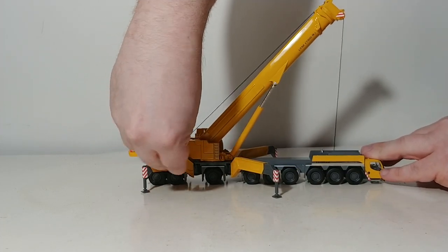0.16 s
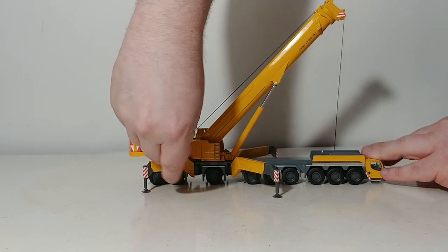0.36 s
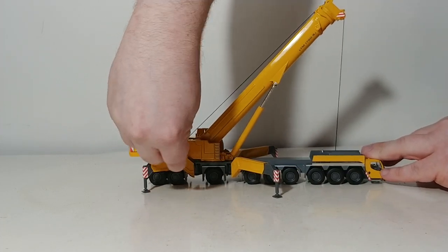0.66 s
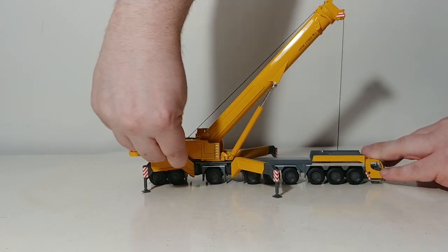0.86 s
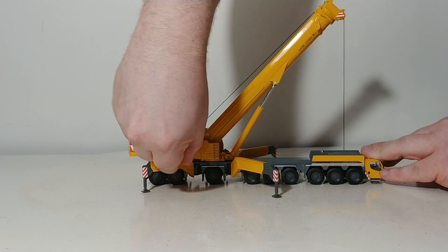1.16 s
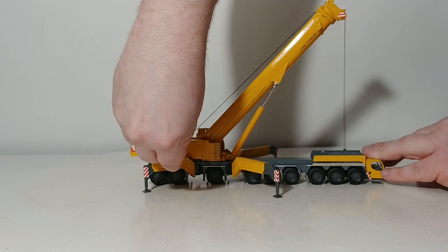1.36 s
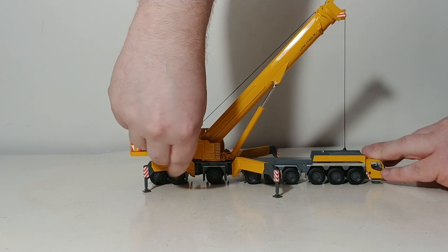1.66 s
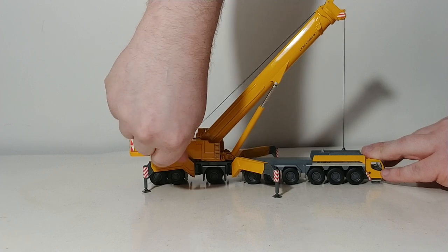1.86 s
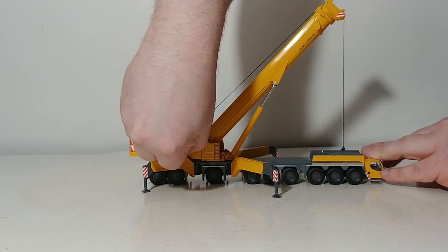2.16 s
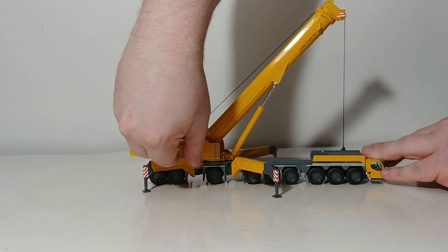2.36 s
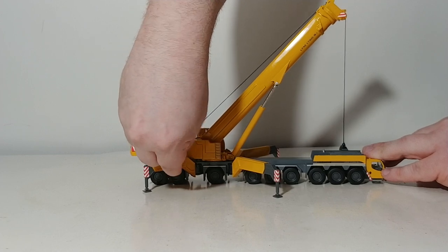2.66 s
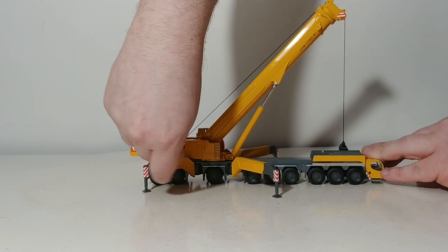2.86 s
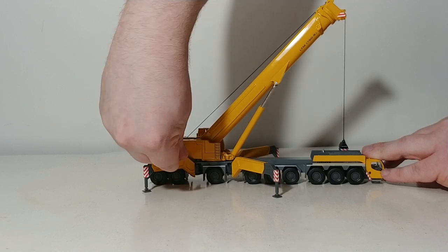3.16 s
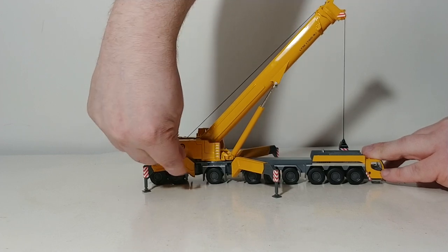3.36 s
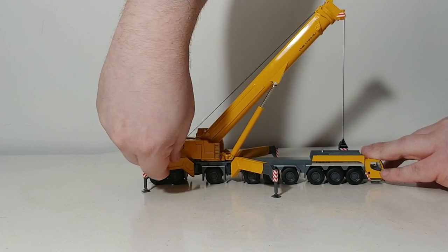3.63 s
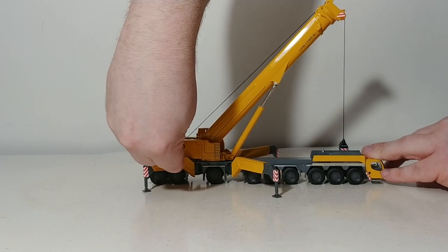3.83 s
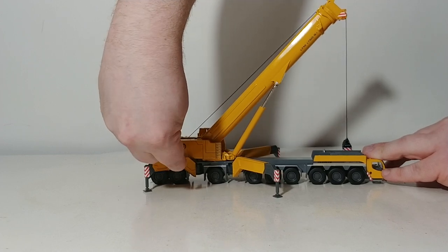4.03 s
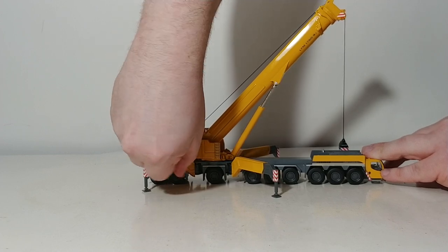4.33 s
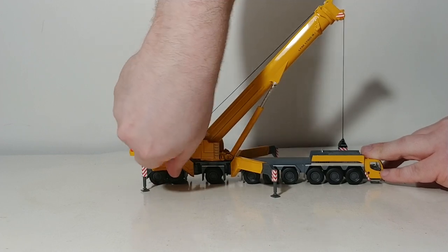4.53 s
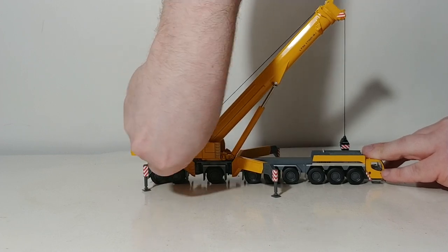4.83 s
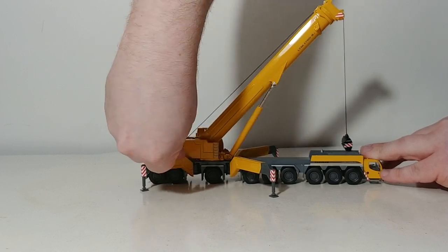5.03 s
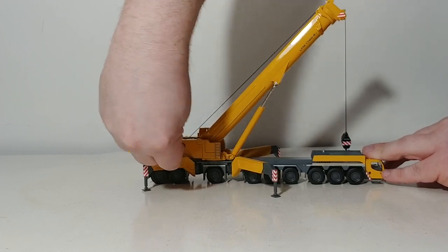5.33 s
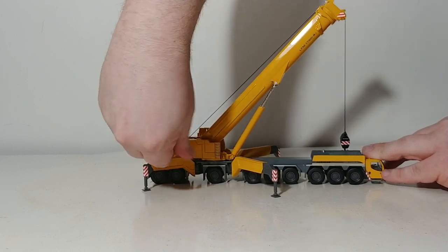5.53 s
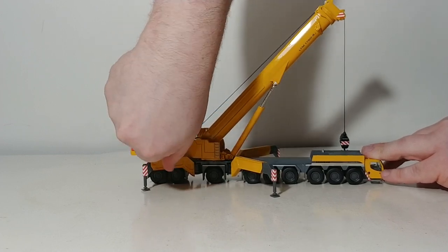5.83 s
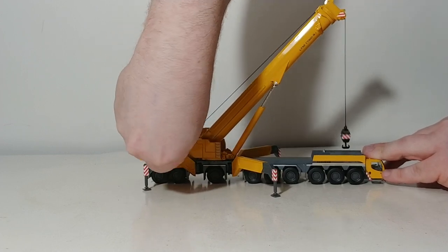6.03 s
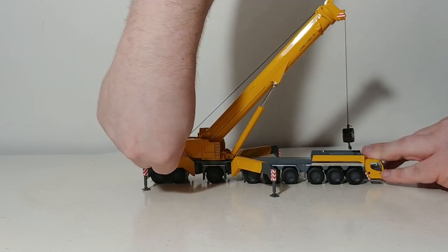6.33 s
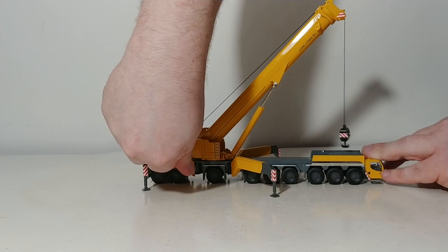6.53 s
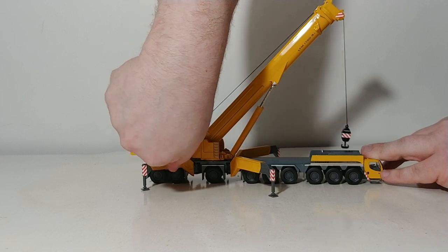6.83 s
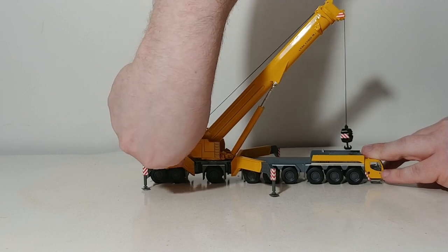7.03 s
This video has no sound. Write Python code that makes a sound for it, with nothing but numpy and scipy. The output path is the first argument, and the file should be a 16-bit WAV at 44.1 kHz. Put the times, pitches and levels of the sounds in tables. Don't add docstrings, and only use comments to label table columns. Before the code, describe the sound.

A small metal model crane's ratchet winch is wound by hand, giving uneven bursts of tiny clicks and soft table knocks in a quiet room.

```python
import sys
import numpy as np
from scipy import signal
from scipy.fft import rfft, irfft, next_fast_len
from scipy.io import wavfile
from scipy.ndimage import uniform_filter1d

SR = 44100
rng = np.random.default_rng(int(sys.argv[2]) if len(sys.argv) > 2 else 0)


def voltage_ratio(decibels):
    exponent = np.asarray(decibels, float) / 20
    return 10 ** exponent


def int16_out(signal):
    q = np.round(np.clip(np.atleast_2d(signal).T, -1, 1) * 32767)
    wavfile.write(sys.argv[1], SR, q.astype(np.int16))


N = 316811
SIZE = next_fast_len(N + SR // 2, True)
FREQ = np.arange(SIZE // 2 + 1) * SR / SIZE

# pitch_hz, density_db (per Hz)
HUM_SPECTRUM = [(20, -15), (50, -1.5), (85, 2.5), (125, 0.5), (200, -9), (400, -18), (630, -24.5),
                (1000, -27.5), (2500, -30), (5400, -38.5), (6300, -59), (7400, -45), (11500, -49.5),
                (12600, -60)]
# pitch_hz, likeness (0-1)
HUM_LIKENESS = [(60, 0.6), (130, 0.83), (270, 0.78), (580, 0.1), (1230, -0.1), (2620, 0), (5570, 0.01),
                (11800, 0.1)]
# pitch_hz, balance_db
HUM_BALANCE = [(60, -5), (110, -0.5), (190, 4), (350, -1.5), (630, 5), (1130, 2), (2030, 0.5), (3660, -0.5),
               (6580, 6.5), (11800, -3)]
# pitch_hz, balance_db
PORT_BALANCE = [(30, -5), (80, .5), (170, 1), (350, 1), (700, -2.5), (1400, 0), (2800, 2), (5000, 9),
                (9500, 3), (12000, -2)]
# pitch_hz, lead_rad
PORT_PHASE = [(0, 1), (780, -2), (1030, 2), (1460, 0.4), (2240, 0.96), (3450, 1.58), (3880, 1.8),
              (4390, -5), (5940, -11), (7580, -3.5), (8700, -13), (9730, -14.5), (10800, -22), (12000, -21)]

# pitch_hz, level_db, t60_s
BODY_MODES = [(1355, -10, 0.047), (1494, -9.5, 0.058), (1666, -15.5, 0.08), (2060, -9.5, 0.07),
              (2300, -4, 0.059), (2450, -8, 0.055), (2670, -9.5, 0.028), (2972, -3, 0.06),
              (3160, -8, 0.053), (3538, -6.5, 0.069), (3643, -7, 0.09), (3814, -5.5, 0.082),
              (4030, -11, 0.057), (4360, -6.5, 0.046), (4545, -13, 0.085), (4800, -15, 0.061),
              (5150, -14, 0.069), (5520, -12, 0.032)]
# pitch_hz, level_db, t60_s
CHASSIS_MODES = [(259.8, -5.5, 0.2), (343.5, -0.5, 0.21), (437, 3, 0.092), (519.5, 2.5, 0.094),
                 (666, 1, 0.09), (762.3, 2, 0.1), (855, -12, 0.051), (1049, -7, 0.05)]
# pitch_hz, level_db, t60_s
TABLE_MODES = [(44.7, -18.5, .15), (81.3, 1.5, 0.22), (118.2, 3.5, 0.14), (179.1, -0.5, 0.16),
               (252.7, -3, 0.13), (329.7, -2, 0.18), (416.3, -9, 0.17)]
# pitch_hz, width_hz, level_db
PAWL_BANDS = [(7450, 1800, -3.5), (8400, 1300, 2), (9330, 770, -8), (10900, 1000, -4)]
# pitch_hz, density_db (per Hz)
CRACK_SPECTRUM = [(290, -17), (500, -23), (951, 0), (2240, 4), (3180, 1), (3730, -14), (4900, 7.5),
                  (6730, -12), (8680, -56), (11600, -30), (12300, -55), (16000, -69), (22000, -120)]

# time_s, level_db
HAND_RUMBLE = [(0.0, -61), (0.92, -59), (1.08, -58.5), (2.28, -57), (2.36, -58.5), (2.96, -63), (3.88, -62),
               (4.08, -52), (4.62, -59), (4.8, -51), (4.98, -45), (5.4, -62), (5.7, -69), (6.0, -56),
               (6.2, -42.5), (6.52, -62), (6.7, -61), (7.18, -54)]
# start_s, length_s, level_db, low_mid_db (relative)
GEAR_RATTLES = [(0, 0.014, -57.5, 7.5), (0.326, 0.1, -71, 11), (0.741, 0.22, -68, 8),
                (0.986, 0.099, -76, 0), (1.261, 0.096, -51.5, 0), (1.334, 0.19, -72, 11.5),
                (1.436, 0.01, -52, -9), (1.624, 0.053, -62, -12), (1.669, 0.14, -68, -14),
                (2.027, 0.23, -70, 7.5), (2.164, 0.27, -73.5, 14), (2.575, .12, -62.5, 8),
                (3.875, 0.13, -67, 9), (3.994, 0.16, -56, 8.5), (4.142, 0.29, -72, 1), (4.035, .04, -56, 0),
                (4.353, 0.05, -68, 16), (4.775, 0.098, -59.5, 3.5), (4.893, 0.04, -46, -4),
                (4.945, 0.05, -45.5, -13), (4.99, .055, -49, -14), (5.055, 0.08, -54, -9),
                (5.245, 0.036, -64.5, 8), (5.996, .05, -60, 10), (6.04, .085, -52.5, 7), (6.15, .2, -59, 6),
                (6.352, 0.15, -68, 5.5), (6.892, 0.2, -73, 10)]
# start_s, peak_db, pitch_hz
SHOVES = [(.004, -42, 112), (.171, -62, 67.3), (.75, -45.5, 83.4), (1.3, -31, 96.9), (1.399, -39, 53.8),
          (1.489, -36, 122.5), (1.678, -54, 80.7), (2.058, -44, 79.6), (2.179, -38.5, 68.6),
          (2.594, -35, 131), (2.629, -34.5, 56.5), (4.043, -30.5, 103), (4.083, -36.5, 85),
          (4.355, -39, 320), (4.784, -36, 103.5), (4.887, -30.5, 351), (4.938, -24, 306),
          (5.011, -36.5, 348), (5.268, -44.5, 170), (6.039, -31.5, 100), (6.084, -34, 80.7),
          (6.479, -41.5, 122)]
# start_s, peak_db, pitch_hz
JOLTS = [(.34, -40.5, 107), (.384, -42.5, 139), (.468, -41.5, 155), (.798, -42.5, 110), (.842, -44, 265),
         (.888, -42.5, 108), (1.274, -32.5, 99.6), (1.866, -34, 169.3), (2.31, -37.5, 159),
         (2.359, -44.5, 99.6), (3.298, -51.5, 362), (3.959, -40.5, 108), (3.999, -38, 320),
         (4.169, -46.5, 176), (4.249, -51.5, 329), (4.988, -31, 261.2), (5.057, -37, 290),
         (5.084, -41, 267), (6.005, -31, 175.6), (6.164, -34.5, 106), (6.216, -37.5, 323),
         (6.268, -38, 87.5), (6.314, -41.5, 320), (6.373, -41.5, 91.5), (6.414, -49, 79.4),
         (6.949, -49, 100)]

# start_s, peak_db, knock_db
BOOM_SLIPS = [(0.3488, -50, 2), (.383, -41, -7.5), (0.4659, -56, 0), (.7312, -56.5, -6), (.84, -37.5, -5),
              (0.9304, -49.5, -2.5), (1.764, -49, -11), (2.1487, -50.5, 3), (2.1763, -34, -2.5),
              (2.255, -47, -15), (2.358, -45, -2), (2.654, -47, -3), (3.4678, -57.5, 2), (3.9663, -53, 10),
              (4, -33.5, -5.5), (4.0827, -36, 1.5), (4.138, -48, -2), (4.1664, -41.5, -5), (4.245, -48, -4),
              (4.349, -46, 6), (4.6325, -51.5, -4), (6.0881, -36.5, -2), (6.2163, -34, 0),
              (6.2692, -53, -6), (6.3148, -36, -1), (6.3624, -48.5, 2), (6.4911, -52, 3)]
# start_s, peak_db, pitch_hz, treble_db
PAWL_SNAPS = [(0.275, -52.5, 2150, -14.5), (1.2513, -60, 2900, -21), (1.493, -31, 4030, -13),
              (1.6397, -48, 3600, -25), (1.6787, -41, 3720, -15.5), (1.711, -46, 1950, -16),
              (1.863, -46, 2440, -16.5), (2.965, -57.5, 2530, -13), (4.2308, -58, 2300, -25),
              (4.4466, -46, 2750, -16.5), (4.5306, -48, 2300, -17), (4.8849, -24, 2450, -15),
              (4.9376, -24, 4360, -21.5)]
# start_s, peak_db, pitch_hz
PINGS = [
    (1.1144, -45.5, 2330),
    (4.3018, -49.5, 2086),
    (4.5131, -64, 2070),
    (5.683, -49, 2374),
    (6.4655, -48.5, 1400),
]
# start_s, peak_db, pitch_hz
DRUM_CLACKS = [
    (0.1573, -60.5, 1940),
    (1.3013, -40.5, 2385),
    (1.9698, -59, 2180),
    (2.017, -60, 2360),
    (2.2313, -57, 2320),
    (2.3288, -55, 2230),
    (2.5918, -52, 2330),
    (6.0351, -43, 2300),
    (6.6466, -58, 2350),
]
# start_s, peak_db, pitch_hz, knock_db
SEAT_KNOCKS = [(0.8059, -52.5, 1140, 7), (0.9075, -50.5, 1160, 2), (1.6122, -64, 1350, -7),
               (2.3111, -52.5, 1160, -0.5), (2.5671, -56.5, 1510, -10), (2.9201, -59.5, 1460, 4),
               (3.2959, -52.5, 1380, 8.5), (3.3184, -54.5, 1390, 2), (3.8328, -61.5, 1430, -5),
               (3.907, -55, 1160, -0.5), (3.9518, -54.5, 1270, 11.5), (4.0479, -48, 1395, 0.5),
               (4.371, -43, 1230, 7.5), (4.7726, -57, 1370, -0.5), (4.7867, -39.5, 1480, -1.5),
               (4.808, -45.5, 1280, -3), (6.002, -50.5, 2180, 13)]
# start_s, peak_db, pitch_hz, knock_db
GEAR_JUMPS = [(1.277, -34, 2870, -10), (1.3435, -38.5, 3230, -3.5), (1.4483, -33.5, 3810, -10.5),
              (2.0556, -44.5, 2220, -17), (4.9861, -29, 4360, -16), (5.012, -35, 4370, -15),
              (5.0569, -32.5, 4440, -21), (5.2486, -63, 3150, -2), (5.268, -49, 4800, 2),
              (6.1654, -41.5, 3160, -7.5), (6.4144, -40.5, 3010, -3.5)]
# start_s, peak_db, pitch_hz, focus (0-1)
MORE_SLIPS = [
    (.105, -58, 2150, 0.3),
    (1.267, -41, 3000, 0.08),
    (4.949, -28.5, 4360, 0.24),
    (5.171, -60, 3550, .33),
    (5.997, -62, 2300, 0.8),
    (6.017, -55, 2300, 0.9),
    (6.906, -59, 3060, 0.34),
]
# start_s, peak_db, pitch_hz, t60_s
PART_RINGS = [(.2748, -55, 4900, .015), (1.1145, -62, 2334, .04), (1.28, -37, 275, .15),
              (1.31, -39, 290, .12), (1.4, -46, 240, .1), (1.2773, -38, 2910, .02),
              (1.302, -46, 2330, .06), (1.3445, -42, 3040, .03), (1.3945, -61, 2070, .015),
              (1.4144, -60, 3640, .015), (1.4486, -32, 1800, .012), (1.493, -41, 2890, .02),
              (1.629, -52.5, 3500, .02), (1.6863, -43, 2080, 0.024), (1.79, -57, 4030, .03),
              (1.8631, -54, 2370, .06), (1.983, -62, 1450, .03), (2.056, -49, 3710, .08),
              (2.097, -67, 8000, .02), (2.1762, -43.5, 1505, 0.028), (2.1765, -43, 2300, .03),
              (2.177, -52, 8400, .025), (2.178, -46, 620, .06), (2.231, -58, 3600, .012),
              (2.329, -56, 3670, .012), (2.358, -48.5, 3000, .02), (2.778, -65, 1700, .015),
              (2.9201, -59, 2100, 0.011), (2.9652, -59, 2555, .06), (3.296, -60, 2100, .012),
              (3.368, -67, 2500, .03), (3.4675, -63, 3050, .03),
              (4.245, -55, 835, .07), (4.302, -49.5, 2900, .02), (4.349, -54, 2900, .012),
              (4.366, -50, 2350, .02), (4.4463, -50.5, 3530, .025), (4.449, -54.5, 1700, .04),
              (4.447, -53, 5000, .025), (4.531, -59, 5000, .02), (4.532, -55, 1300, .02),
              (4.533, -47, 2346, .05), (4.633, -55, 3100, .03), (4.7864, -47, 2090, 0.023),
              (4.832, -53, 3750, .04), (4.885, -25, 2380, .022), (4.8853, -35, 1740, 0.015),
              (4.908, -41, 3000, .02), (4.9377, -33, 5060, .025), (4.949, -37, 2400, 0.028),
              (4.9866, -37.5, 2390, 0.035), (5.012, -40, 2300, .03), (5.025, -38, 4500, .04),
              (5.0572, -35, 4385, 0.044), (5.083, -48.5, 2510, .03), (4.808, -50, 3900, .03),
              (5.083, -50, 1500, .03), (5.23, -62, 2500, .03), (5.52, -64, 2300, .04),
              (5.56, -61.5, 2300, .03), (5.996, -52, 2320, .14), (6.008, -41.5, 900, .04),
              (6.015, -48, 2320, .12), (6.021, -52, 3100, .02), (6.048, -46, 2316, .06),
              (6.05, -47, 4300, .03), (6.088, -42.5, 2960, 0.023), (6.1726, -45.5, 3980, 0.045),
              (6.174, -46, 3000, .02), (6.2163, -40, 3090, .03), (6.218, -41, 1490, 0.036),
              (6.232, -46, 4400, .03), (6.29, -54.5, 1600, .02), (6.3145, -41.5, 3100, .025),
              (6.316, -44, 2300, .05), (6.374, -50.5, 3830, 0.046), (6.4143, -47, 4490, .04),
              (6.417, -46, 2300, .05), (6.475, -52, 2450, .05), (6.492, -51, 2450, 0.045),
              (6.66, -58.5, 1340, .03)]


def on_log(points, hz=FREQ):
    f, v = np.transpose(points)
    return np.interp(np.log(hz + 1), np.log(f + 1), v)


def shape(x, gain):
    return irfft(rfft(x, SIZE) * gain, SIZE)[..., :N]


def unit(x):
    return x / np.sqrt(np.mean(x ** 2))


def add(out, start_s, sound):
    i = int(start_s * SR)
    out[..., i:i + sound.shape[-1]] += sound[..., :N - i]


def walk(rate):
    k = int(SR / rate)
    held = np.repeat(rng.standard_normal(N // k + 1), k)
    return uniform_filter1d(uniform_filter1d(held, k), k)[:N]


def dull(top_hz):
    return signal.freqs(*signal.butter(5, top_hz, analog=True), FREQ)[1] ** 2


def bands(resonances):
    return sum(voltage_ratio(db) / (1 + 2j * (FREQ - hz) / width) ** 2 for hz, width, db in resonances)


def resonate(force, modes, widen, top_hz):
    gain = 0
    for hz, db, t60 in modes:
        width = widen * np.log(1000) / np.pi / t60
        gain = gain + voltage_ratio(db) / (1 + 2j * (FREQ - hz) / width)
    return unit(shape(force, gain * dull(top_hz)))


def ring(modes, extra_db, chance, length_s, rise_s, blow=0):
    hz, db, t60 = np.transpose(modes)[:, :, None]
    t = np.arange(int(length_s * SR)) / SR
    phase = 2 * np.pi * hz * (1 + 0.0068 * chance[0][:, None]) * t + np.pi * chance[1][:, None]
    decay = np.exp(-np.log(1000) * t / t60)
    y = (voltage_ratio(db + extra_db[:, None]) * decay * np.sin(phase)).sum(axis=0)
    y = y * (1 - np.exp(-t / rise_s)) * (1 + blow * np.exp(-t / 0.0029))
    return y / np.abs(y).max()


def chatter(sound, share_db, t60_s):
    t = np.arange(int(t60_s * SR)) / SR
    noise = rng.standard_normal((3, len(t))) * (rng.random(len(t)) < 0.025)
    bounces = voltage_ratio(share_db) * (noise[0] + 1.7 * noise[1:]) * np.exp(-np.log(1000) * t / t60_s)
    bounces[:, 0] = 1
    y = signal.fftconvolve(sound[None], bounces, axes=1)
    return y / np.abs(y).max()


def hum():
    alike = np.clip(on_log(HUM_LIKENESS), 0, 1)
    shared, own = rng.standard_normal(N), rng.standard_normal((2, N))
    side = np.array([[1], [-1]]) / 2
    colour = voltage_ratio(on_log(HUM_SPECTRUM) + on_log(HUM_BALANCE) * side)
    tone = shape(shared, colour * np.sqrt(alike)) + shape(own, colour * np.sqrt(1 - alike))
    return unit(tone) * voltage_ratio(-59 + 0.32 * walk(3.2))


def rumble():
    time_s, level_db = np.transpose(HAND_RUMBLE)
    noise = rng.standard_normal((3, N))
    shake = (noise[0] + 0.35 * noise[1:]) * voltage_ratio(2.5 * walk(30))
    level = voltage_ratio(np.interp(np.arange(N) / SR, time_s, level_db) - 4)
    return resonate(shake, TABLE_MODES, 2.86, top_hz=697) * level


def rattle():
    slips_per_s, scatter_db = 750, 3.3
    t = np.arange(N) / SR
    strength = voltage_ratio(scatter_db * np.minimum(rng.exponential(size=N), 3))
    noise = rng.standard_normal((3, N))
    force = (rng.random(N) < slips_per_s / SR) * strength * (noise[0] + 1.19 * noise[1:])
    high = resonate(force, BODY_MODES, 2.2, top_hz=5500)
    high = high + voltage_ratio(-22) * unit(shape(force, bands(PAWL_BANDS)))
    low = resonate(force, CHASSIS_MODES, 7.3, top_hz=1573)
    high_gain, low_gain = np.zeros((2, N))
    for start_s, length_s, db, low_db in GEAR_RATTLES:
        corners_s = start_s + np.array([0, 0.008, 0.52 * length_s, 1.096 * length_s])
        gate = np.interp(t, corners_s, [0.0017, 0.57, 0.7, 0.0026])
        high_gain += voltage_ratio(db) * gate
        low_gain += voltage_ratio(db + low_db) * gate
    return high * high_gain + low * low_gain


def thumps():
    shove_t60_s, jolt_t60_s = 0.046, 0.19
    out, modes_hz = np.zeros((2, N)), np.transpose(TABLE_MODES)[0]
    blows = [(*row, shove_t60_s) for row in SHOVES] + [(*row, jolt_t60_s) for row in JOLTS]
    for start_s, db, hz, t60 in sorted(blows):
        chance = rng.standard_normal((3, len(TABLE_MODES) + 1))
        near_db = -9 - 6 * np.abs(np.log2(modes_hz / hz)) + 3.7 * chance[2, 1:]
        top = ring(TABLE_MODES + [(hz, 0, t60)], np.append(near_db, 0), chance, 0.38, 0.0027)
        add(out, start_s, voltage_ratio(db - 0.5) * chatter(top, -22.5, 0.035))
    return out


def slips():
    rows = [(s, db, 3767, knock, -25, 0.33) for s, db, knock in BOOM_SLIPS]
    for s, db, hz, treble in PAWL_SNAPS:
        rows.append((s, db, hz, -13, treble, 0.22 - 0.1 * (db + 41)))
    rows += [(*row, -20, -39, 0.77) for row in PINGS]
    rows += [(*row, 1.5, -36, 0.46) for row in DRUM_CLACKS]
    for s, db, hz, knock in SEAT_KNOCKS:
        rows.append((s, db, hz, knock, -31, 0.29 + 0.15 * knock))
    for s, db, hz, knock in GEAR_JUMPS:
        rows.append((s, db, hz, knock, -26 + 0.9 * knock, 0.27))
    more_slips = [(s, db, hz, -19, -14.5 - 32 * focus, focus) for s, db, hz, focus in MORE_SLIPS]
    return sorted(rows) + more_slips


def ratchet():
    out, cracks, snaps = np.zeros((3, 2, N))
    modes_hz = np.transpose(BODY_MODES)[0]
    damped_body = [(hz, db, 0.7 * t60) for hz, db, t60 in BODY_MODES]
    parts_n = len(CHASSIS_MODES)
    t = np.arange(3000) / SR
    crack_decay = np.exp(-t / 0.0011)
    snap_decay = np.exp(-t / 0.0016) + 0.22 * np.exp(-t / 0.011)
    for start_s, db, hz, knock_db, treble_db, focus in slips():
        chance = rng.standard_normal((2, 3, len(BODY_MODES) + 1))
        chance[0, 0, -1] = 0
        focus = np.clip(focus, 0, 1)
        near_db = -45 * focus * np.abs(np.log2(modes_hz / hz)) - 6 * focus + 3.9 * chance[0, 2, 1:]
        body = ring(damped_body + [(hz, -6, 0.05)], np.append(near_db, 0), chance[0],
                    0.11, 0.00046, blow=3.6 * (1 - focus))
        knock = ring(CHASSIS_MODES, 3.4 * chance[1, 2, :parts_n], chance[1, :, :parts_n],
                     0.15, 0.0017, blow=0.67)
        noise = rng.standard_normal((2, 3, len(t)))
        crack = crack_decay * (noise[0, 0] + 1.35 * noise[0, 1:])
        snap = snap_decay * (noise[1, 0] + 1.55 * noise[1, 1:])
        add(out, start_s, voltage_ratio(db - 0.5) * chatter(body, -14.5, 0.05))
        add(out, start_s, voltage_ratio(db + knock_db - 0.5) * chatter(knock, -16, 0.02))
        add(cracks, start_s, voltage_ratio(db - 1 - 32 * focus) * crack)
        add(snaps, start_s, voltage_ratio(db + treble_db) * snap)
    metal = shape(out, dull(top_hz=5680))
    cracks = voltage_ratio(2) * shape(cracks, voltage_ratio(on_log(CRACK_SPECTRUM)) * dull(top_hz=6080))
    return metal + cracks + voltage_ratio(5.5) * shape(snaps, bands(PAWL_BANDS))


def parts():
    out = np.zeros((2, N))
    for start_s, db, hz, t60 in PART_RINGS:
        chance = rng.standard_normal((3, 5))
        cluster = [(hz, 0, t60)]
        cluster += [(hz * (1 + 0.055 * c), -6, 0.6 * t60) for c in chance[2, 1:]]
        note = ring(cluster, np.zeros(5), chance, 0.12, 0.00033, blow=0.85)
        add(out, start_s, voltage_ratio(db - 3) * chatter(note, -14, 0.03))
    return out


def squeak():
    start_s, length_s, pitch_hz, level_db, sag_hz_per_s = 4.925, 0.19, 8240, -62, 700
    t = np.arange(N) / SR - start_s
    swell = np.sin(np.pi * np.clip(t / length_s, 0, 1)) * voltage_ratio(level_db + 2.5 * walk(60))
    return swell * np.sin(2 * np.pi * (pitch_hz - sag_hz_per_s * t / 2) * t + 1.5 * walk(160))


def ports():
    log_gain = on_log(PORT_BALANCE) / 2 * np.log(10) / 20
    lead_rad = np.interp(FREQ, *np.transpose(PORT_PHASE)) / 2
    return np.exp((log_gain + 1j * lead_rad) * np.array([[1], [-1]]))


def room():
    t60_s, level_db, top_hz = 0.13, -4, 4840
    t = np.arange(int(0.5 * SR)) / SR
    tail = rng.standard_normal((2, len(t))) * np.exp(-np.log(1000) * t / t60_s) * (t > 0.003)
    tail = tail / np.sqrt(np.sum(tail ** 2, axis=1, keepdims=True))
    thin = FREQ / (FREQ + 400) / np.sqrt(1 + (FREQ / top_hz) ** 2)
    return voltage_ratio(level_db) * rfft(tail, SIZE) * thin


def scene():
    tone = hum()
    crane = rumble() + rattle() + thumps() + ratchet() + parts() + squeak()
    return shape(crane, ports() * (1 + room())) + tone


def band_limit(x):
    return signal.sosfilt(signal.butter(12, 12440, fs=SR, output="sos"), x)


def record(dry):
    return band_limit(dry)


dry = scene()
out = record(dry)
int16_out(out)
```